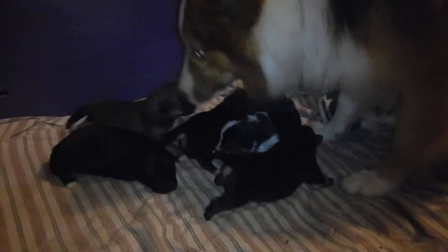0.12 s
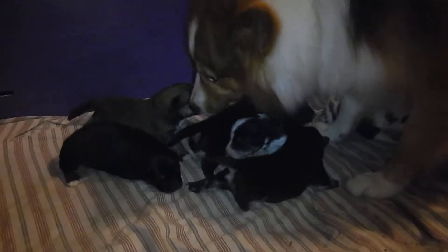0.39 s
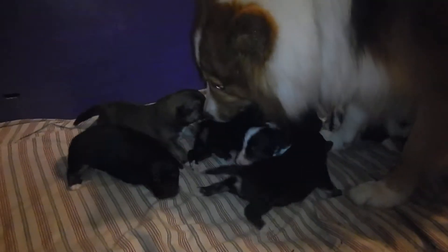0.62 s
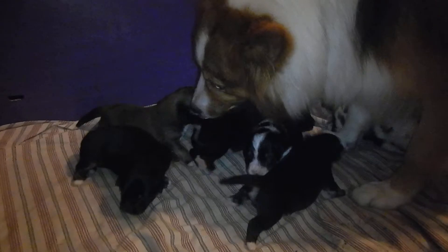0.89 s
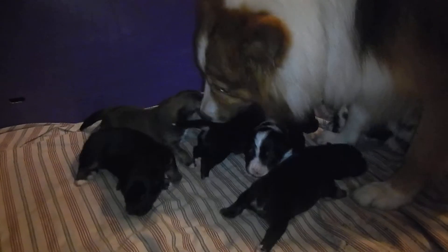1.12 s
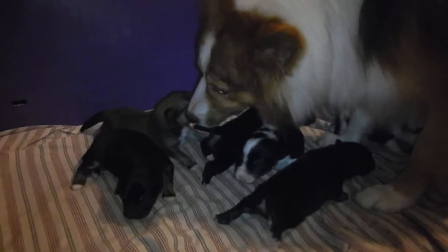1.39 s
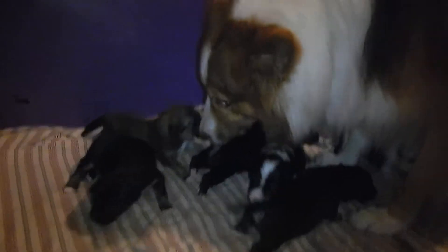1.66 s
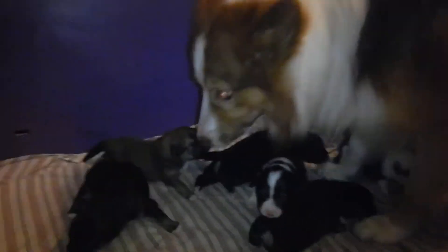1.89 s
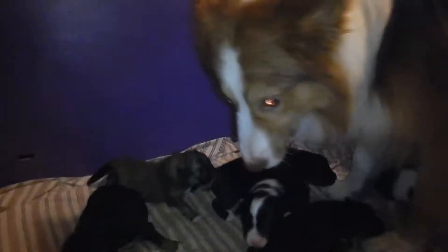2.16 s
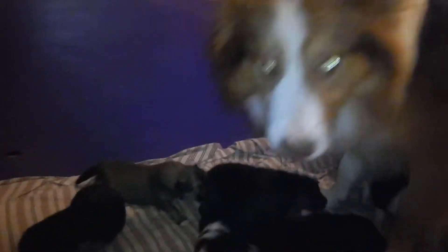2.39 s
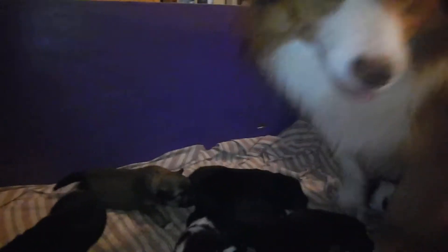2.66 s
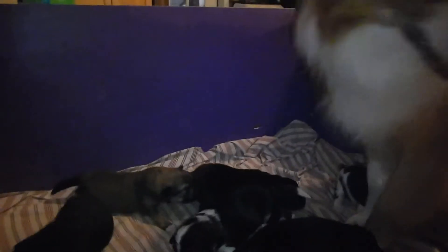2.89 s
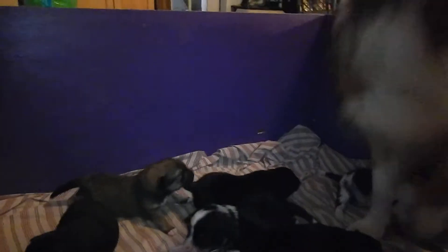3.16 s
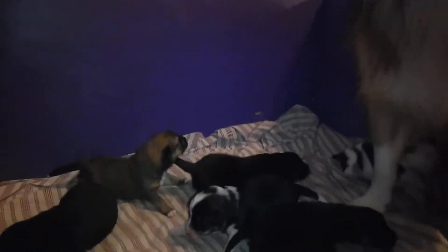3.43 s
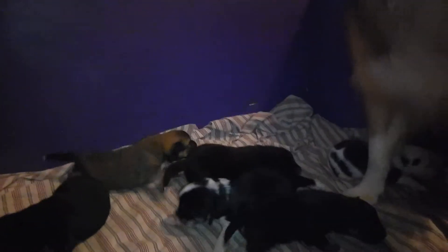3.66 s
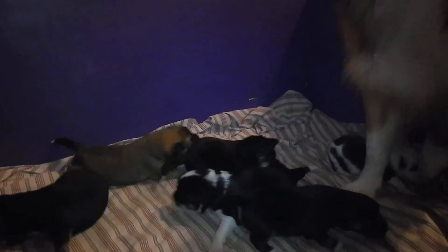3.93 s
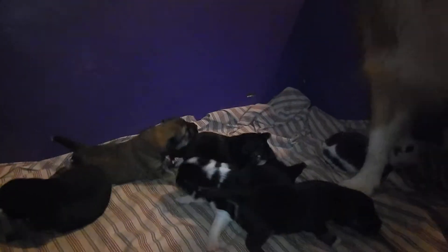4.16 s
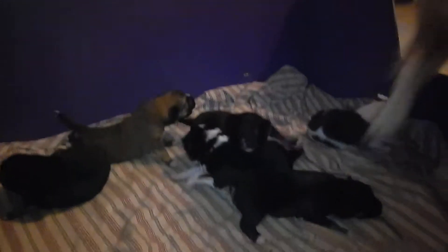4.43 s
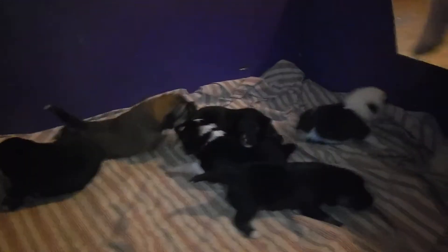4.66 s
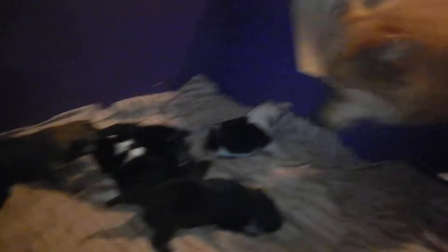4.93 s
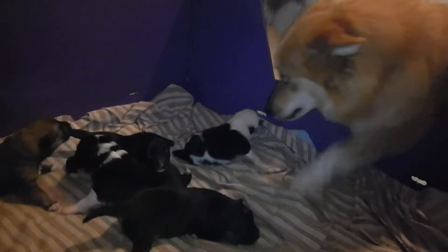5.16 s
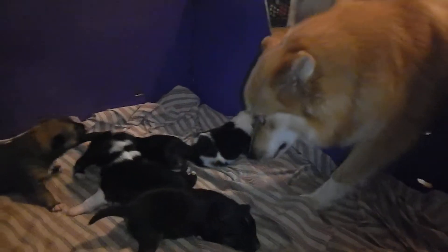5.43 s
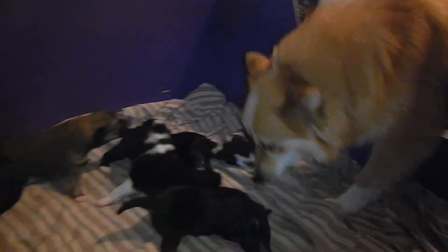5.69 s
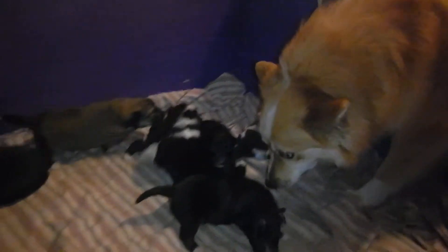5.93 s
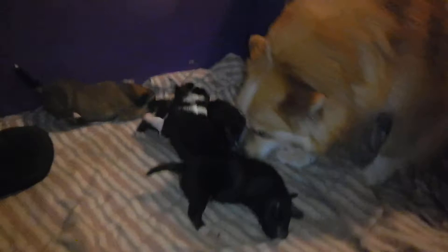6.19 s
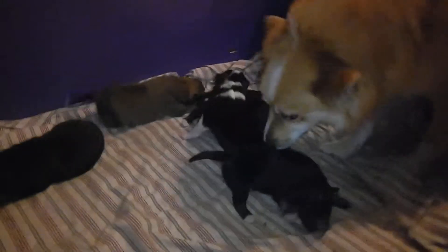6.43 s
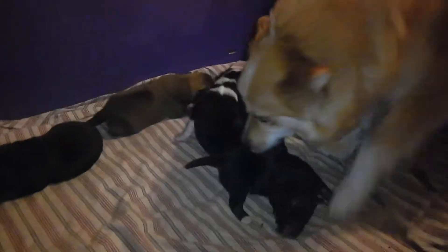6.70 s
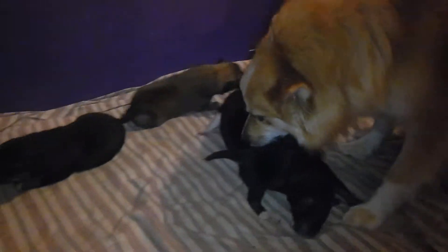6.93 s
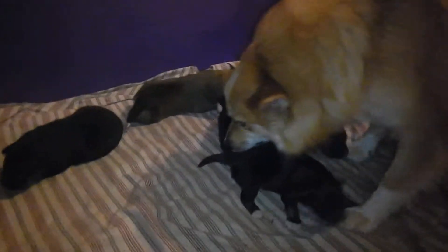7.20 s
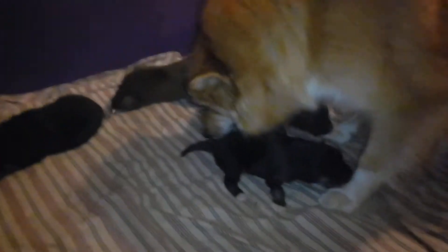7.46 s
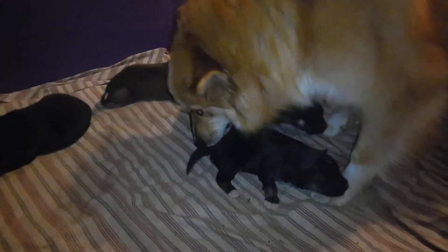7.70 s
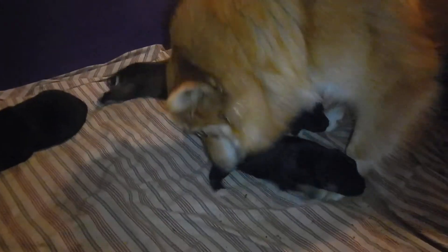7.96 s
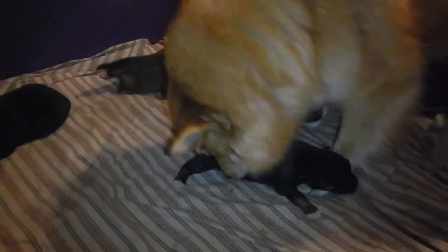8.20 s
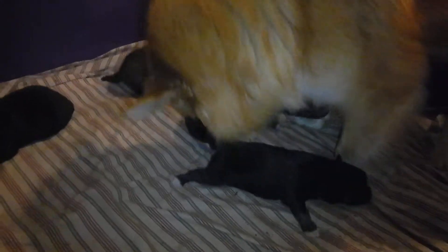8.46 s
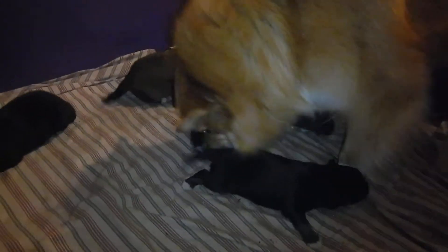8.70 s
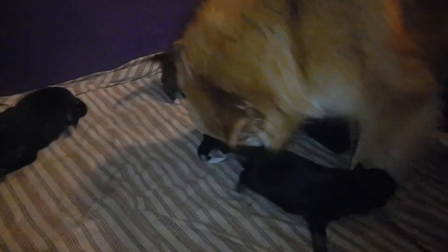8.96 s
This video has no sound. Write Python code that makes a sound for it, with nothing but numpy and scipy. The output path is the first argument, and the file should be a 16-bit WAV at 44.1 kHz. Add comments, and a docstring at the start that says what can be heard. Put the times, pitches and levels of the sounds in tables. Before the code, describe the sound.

Indoors, a low steady hum and soft air lie beneath fine blanket rustling and tiny claw ticks. Clicks, muffled bumps and faint puffs from a big dog's nose cluster early, then thin gliding puppy squeaks rise, loudest midway alongside several deep paw thumps. Weaker whimpers and occasional taps trail on to the end. Everything is near the microphone, with a short echo from the pen walls.

```python
"""A mains hum, the air of a room and faint rustling come first; then clicks, thumps, newborn puppies' cries, sniffs.
The pups squeak and whimper on a blanket in a walled pen, close to a hand-held camera: gliding near sines
with weak overtones, and one creak of throat pulses. Big dogs puff shaped noise over the litter; cloth rustles
as lumpy noise; claws and tongues click as short bursts; paws thump the pen floor as damped oscillations."""
import sys
import numpy as np
from scipy import signal
from scipy.fft import rfft, irfft
from scipy.io import wavfile
from scipy.ndimage import uniform_filter1d

SR = 44100
rng = np.random.default_rng(int(sys.argv[2]) if len(sys.argv) > 2 else 0)


def generate_wav(signal):
    """Clip the signal to [-1, 1] and save it as 16-bit WAV at the path in sys.argv[1]."""
    frames = np.transpose(np.atleast_2d(signal))
    scaled = np.clip(frames, -1, 1) * 32767
    pcm = np.round(scaled).astype(np.int16)
    wavfile.write(sys.argv[1], SR, pcm)


def how_loud(loudness_db):
    """Turn decibels into a plain amplitude multiplier (0 dB gives 1, 20 dB gives 10)."""
    steps = np.asarray(loudness_db, float) / 20
    return 10 ** steps


N = 400869
T = np.arange(N) / SR
LEFT_RIGHT = np.array([[1], [-1]])


def interp_log(hz, points):
    """Logarithmic frequency scale: interpolates the second column of points along log f."""
    point_hz, values = np.transpose(points)
    return np.interp(np.log(hz), np.log(point_hz), values)


def colour(x, points):
    """Spectral weighting: shapes x by (f/Hz, level/dB) points; unit rms for unit white noise."""
    hz = np.fft.rfftfreq(x.shape[-1], 1 / SR) + 1
    gain = how_loud(interp_log(hz, points))
    return irfft(rfft(x) * gain / np.sqrt(np.mean(gain ** 2)), x.shape[-1])


def walk(rate):
    """Band-limited fluctuation: random levels held 1 / rate s and smoothed twice; spread near 1."""
    hold = int(SR / rate)
    steps = np.repeat(rng.standard_normal(N // hold + 1), hold)
    return 1.34 * uniform_filter1d(uniform_filter1d(steps, hold), hold)[:N]


def ring(hz, t60, length):
    """Damped free oscillation from rest; t60 in s, length in samples."""
    t = np.arange(length) / SR
    return np.sin(2 * np.pi * hz * t) * np.exp(-np.log(1000) * t / t60)


def add(track, s, sound):
    """Superposition: lays a sound into a track at s seconds."""
    i = int(s * SR)
    track[..., i:i + sound.shape[-1]] += sound[..., :N - i]


# likeness of the two ports in a spread sound: f/Hz, left-right correlation [1]
LIKENESS = [(60, 0.92), (300, 0.7), (1400, 0.71), (2800, 0.48), (4000, 0.43), (7000, 0.036)]


def wide(points, make):
    """Spatial coherence: both ports hear the bass alike and the treble apart."""
    hz = np.fft.rfftfreq(N, 1 / SR) + 1
    alike = np.clip(interp_log(hz, LIKENESS), 0, 1)
    shared, opposed = (rfft(colour(make(), points)) for _ in range(2))
    mixed = np.sqrt(1 + alike) * shared + np.sqrt(1 - alike) * opposed * LEFT_RIGHT
    return irfft(mixed / np.sqrt(2), N)


AIR_DB = -47.5  # mean level; it wanders
HUM_HZ, HUM_DB = 120, -37.5  # mean rms level; it wavers
# spectrum of the room's air: f/Hz, level/dB per Hz
AIR = [(20, -10), (50, 2), (90, 10), (170, 2), (230, 0.5), (310, -10.5), (410, 3), (650, -14.5),
       (1300, -7.5), (2500, -14), (5500, -23), (7500, -23.5), (9500, -28), (16000, -36)]


def room():
    """Broadband noise and a pure tone: slowly wandering air and a slightly wavering hum at twice the mains."""
    air = wide(AIR, lambda: rng.standard_normal(N))
    hum_db = HUM_DB + 1.07 * walk(23) + 0.61 * LEFT_RIGHT
    hum = np.sqrt(2) * how_loud(hum_db) * np.sin(2 * np.pi * HUM_HZ * T)
    return how_loud(AIR_DB + 3.2 * walk(2.686)) * air + hum


def fibres(per_s, scatter_db, smear_s):
    """Stick-slip friction: noise made lumpy by many small catches of uneven size."""
    catches = (rng.random(N) < per_s / SR) * how_loud(scatter_db * rng.exponential(size=N))
    lumps = signal.lfilter([1], [1, -np.exp(-1 / (smear_s * SR))], catches) + 0.65
    x = lumps * rng.standard_normal(N)
    return x / uniform_filter1d(x ** 2, size=8000) ** .5


RISE_SHARE, FADE_SHARE = 0.15, 0.41  # time for a change of 20 dB, as a share of the edge time below
FIRM_DB, SOFTER_PER_DB = -46, 0.9  # firm strokes start and stop abruptly, lighter ones swell and ebb
SQUIRM_PRESS_DB = 8.5  # pressing over rubbing
# fur, paws and noses moving on the blanket: start t/s, length t/s, rub level/dB, press level/dB
RUSTLES = [(0.348, 0.018, -39.5, -45), (0.571, 0.063, -46, -51), (0.834, 0.079, -47, -49.5),
           (1.008, 0.062, -48, -46), (1.78, 0.036, -41.5, -47), (1.866, 0.13, -51, -47.5),
           (2.031, 0.038, -34.5, -35), (2.18, 0.07, -44, -56), (2.458, 0.03, -38, -37),
           (2.573, 0.064, -55, -44.5), (2.723, 0.049, -36.5, -38.5), (2.817, 0.045, -39.5, -40),
           (2.904, 0.14, -46.5, -38.5), (3.01, 0.034, -43, -50), (3.155, 0.025, -42, -45),
           (3.367, 0.042, -48.5, -32), (3.421, 0.061, -40.5, -36.5), (3.803, 0.09, -45, -42),
           (4.142, 0.055, -49, -45), (4.605, 0.11, -51.5, -48.5), (4.708, 0.03, -40, -50.5),
           (4.977, 0.075, -44.5, -44), (5.25, 0.045, -47, -35), (5.446, 0.02, -43, -45),
           (5.624, 0.12, -46.5, -38.5), (5.757, 0.023, -39.5, -33.5), (5.97, 0.058, -50.5, -44.5),
           (6.419, 0.017, -63, -39.5), (6.59, 0.05, -60, -38), (6.825, 0.099, -59, -44),
           (7.5, 0.037, -41, -48), (8.224, 0.012, -66, -42), (8.45, 0.1, -47, -50), (8.6, 0.09, -47.5, -48),
           (8.895, 0.029, -53.5, -44)]
# the litter squirming all along: t/s, rub level/dB
SQUIRM = [(0, -62), (1.2, -58), (2.3, -57.5), (2.5, -69.5), (3.0, -50.5), (3.6, -53.5), (4.05, -92),
          (4.5, -52.5), (5.33, -52), (5.55, -59.5), (6.2, -60), (7.0, -56.5), (7.4, -57.5), (8.0, -62),
          (8.4, -52.5), (9.09, -57)]


def movement():
    """Power addition of envelopes: each rustle rises, holds and fades over the continuous squirming."""
    t = T[::44]
    s, length, rub_db, press_db = np.transpose(RUSTLES)[:, :, None]
    edge_s = length * (2.0 + SOFTER_PER_DB * np.clip(FIRM_DB - rub_db, 0, 12))
    outside_s = np.maximum((s - t) / RISE_SHARE, (t - s - length) / FADE_SHARE)
    shape_db = -20 * np.maximum(0, outside_s / edge_s)
    squirm_db = np.interp(t, *np.transpose(SQUIRM))

    def total(db, under_db):
        power = np.sum(how_loud(db + shape_db) ** 2, axis=0) + how_loud(under_db) ** 2
        return np.interp(T, t, np.sqrt(power))

    return total(rub_db, squirm_db), total(press_db, squirm_db + SQUIRM_PRESS_DB)


# spectrum of fur brushing cloth, also of the scuff after a click: f/Hz, level/dB per Hz
RUB = [(700, -22), (1500, 0.5), (2300, 1), (3500, -4.5), (5500, -8), (7200, -10.5), (9000, -27),
       (15000, -31)]
# spectrum of the blanket crumpling: f/Hz, level/dB per Hz
PRESS = [(35, 3.5), (110, 13.5), (250, -8), (420, 5.5), (800, 0), (1500, -3), (2400, -1.5), (3000, -12.5),
         (5000, -32.5)]


def bedding():
    """Friction noise: fur brushing cloth swishes in fine grains; weight on the blanket crumples lower."""
    rubbing, pressing = movement()
    rub = wide(RUB, lambda: fibres(900, 2.9, .004))
    press = wide(PRESS, lambda: fibres(120, 4.4, 0.022))
    return rub * rubbing + press * pressing


TICKS_PER_S, TICK_DB = 8, -44  # level of the strongest at the centre


def ticks():
    """Impulse excitation: tiny claws snag threads at chance moments, each a brief ring at its own place."""
    out = np.zeros((2, N))
    for when, pitch, size, pan in rng.random((TICKS_PER_S * N // SR, 4)):
        snag = ring(1500 * 4 ** pitch, 0.011, length=400)
        level_db = TICK_DB - 15.0 * size + 6.0 * (pan - .5) * LEFT_RIGHT
        add(out, when * T[-1], how_loud(level_db) * snag)
    return out


# claws and tongues: t/s, contact level/dB, ring f/Hz, treble level/dB relative to the contact
CLICKS = [(0.366, -15, 1630, -16.5), (0.391, -39, 1000, -18), (0.416, -36, 2200, -18), (1.04, -42, 1400, 0),
          (3.353, -30, 1400, -18), (4.868, -34.5, 2096, -10), (6.645, -28.5, 898, -19),
          (2.179, -32, 820, -24), (2.204, -27, 890, -28), (2.248, -28.5, 840, -8), (2.475, -19.5, 2270, -5),
          (2.604, -24, 2040, -10), (2.725, -33.5, 1290, 1), (2.774, -38, 2300, -17),
          (2.921, -31, 1600, -21), (3.007, -28.5, 755, -6), (3.375, -23, 1260, -20),
          (3.383, -20.5, 1600, -13), (3.392, -19, 1430, -43), (3.668, -31, 2140, -5),
          (4.972, -26, 2240, -3), (5.517, -33, 1228, -10), (5.7644, -21, 2885, -2),
          (5.7667, -20.5, 1792, -11), (7.499, -31, 1414, -26), (8.096, -36, 1184, -40),
          (8.218, -28, 687, -14.5), (8.637, -33, 1460, -8)]


def clicks(rise_s=0.000624):
    """Impulsive contact: it builds and lets go in a few cycles, with a bright edge and a scuff after."""
    out = np.zeros((2, N))
    t = np.arange(1500) / SR
    contact = t / rise_s * np.exp(1 - t / rise_s)
    scuff_shape = np.minimum(contact.cumsum() / 60, 1) * np.exp(-t / 0.0053)
    for (s, db, hz, treble_db), (pan, *turns) in zip(CLICKS, rng.standard_normal((len(CLICKS), 5))):
        def tone(f_hz, k):
            return np.sin(2 * np.pi * (f_hz * t + turns[k]))

        def snap(f_hz):
            return np.cos(2 * np.pi * (f_hz * (t - rise_s) + turns[0]))

        body = snap(hz) + .5 * snap(0.72 * hz) + 0.49 * snap(1.476 * hz)
        edge = how_loud(treble_db) * (tone(3510, 2) + 0.59 * tone(4800, 3) * LEFT_RIGHT)
        scuff = 0.15 * colour(rng.standard_normal((2, len(t))), RUB) * scuff_shape
        side = how_loud(2.0 * pan * LEFT_RIGHT / 2)
        add(out, s, how_loud(db) * (contact * (body + edge) + scuff) * side)
    return out


# paws on the pen floor: t/s, boom level/dB, boom f/Hz, knock level/dB
THUMPS = [(0.773, -23, 223, -41), (0.936, -27, 210, -55), (2.724, -20, 432, -42), (2.828, -20, 103, -37),
          (3.005, -28, 120, -26.5), (4.725, -8, 225, -22.5), (4.728, -8.5, 145, -35),
          (4.735, -12, 84, -33.5), (4.762, -14.5, 140, -40), (4.976, -14, 136, -15),
          (4.98, -8.5, 85.8, -22.5), (5.009, -9.5, 89, -50), (5.282, -13, 149, -30),
          (5.393, -10.5, 98.7, -33), (5.682, -30, 134.5, -30), (5.76, -23.5, 135, -25),
          (6.638, -20.5, 127.4, -28.5), (7.242, -27, 380, -27.5), (7.5, -22, 110.7, -26.5),
          (8.099, -34, 117.2, -27.5), (8.22, -40, 400, -27), (8.234, -23, 134, -29.5)]
# modes of the pen's panels, varied at each thump: nominal f/Hz, nominal level/dB, t60 t/s
PANELS = [(235.5, -3, 0.069), (428, 0.5, 0.069), (533, 1.5, 0.039), (661, 4, 0.022)]


def thumps(cycles=14.0):
    """Modal excitation by a soft paw: the floor booms where it gives, and the pen's panels knock."""
    out = np.zeros(N)
    push = np.hanning(60)
    for (s, db, hz, knock_db), shares in zip(THUMPS, rng.standard_normal((len(THUMPS), len(PANELS)))):
        boom_t60 = cycles / hz
        boom = ring(hz, boom_t60, 12000) + 0.27 * ring(1.755 * hz, boom_t60 / 1.12, 12000)
        knock = np.zeros(12000)
        # each mode's sign, strength and slight detuning vary from thump to thump
        for g, (mode_hz, mode_db, t60) in zip(shares, PANELS):
            strength = np.sign(g) * how_loud(mode_db - 3.5 + 2.9 * np.abs(g))
            knock += strength * ring(mode_hz * (1 + 0.037 * g), t60, 12000)
        # the floor gives for about half a cycle of its boom
        give = np.hanning(int(SR / hz / 2))
        add(out, s, how_loud(db) * np.convolve(boom, give / give.sum()))
        add(out, s, how_loud(knock_db) * np.convolve(knock, push / push.sum()))
    return out


YIP_SETTLES, YIP_SWELL_DB = 0.2, 1.5  # time constant of the glide as a share of the length; middle over ends
# whimpers, one table a breath: t/s, pitch f/Hz, level/dB
WHIMPERS = [
    [(1.022, 766, -43), (1.034, 676, -33.5), (1.039, 453, -33), (1.06, 425.4, -31.5), (1.068, 423, -45)],
    [(2.106, 1547, -30.5), (2.122, 1410, -32), (2.127, 1100, -35.5), (2.134, 974, -34.5)],
    [(4.412, 2726, -42), (4.419, 2673, -36), (4.441, 2638, -35), (4.456, 2324, -42)],
    [(8.095, 1410, -35.5), (8.103, 1028, -40), (8.117, 1287, -35.5), (8.126, 1120, -53)],
    [(3.543, 1315, -28), (3.559, 1387, -26.5), (3.609, 2064, -20.5), (3.635, 2138, -20), (3.667, 2074, -27),
     (3.671, 1540, -31.5), (3.681, 1380, -48)],
    [(3.897, 2340, -26), (3.905, 2350, -20), (3.933, 2147, -25.5), (3.953, 2247, -23.5), (3.963, 2220, -41)],
    [(4.642, 2350, -24), (4.648, 2370, -12.5), (4.672, 2457, -16), (4.692, 2450, -14.5),
     (4.708, 2314, -11.5), (4.73, 2226, -27), (4.746, 2025, -31), (4.758, 2106, -24), (4.79, 2005, -40)],
    [(4.973, 2193, -18.5), (5.011, 2470, -27), (5.039, 2476, -22.5), (5.061, 2170, -28.5),
     (5.081, 1984, -18.5), (5.097, 1896, -42), (5.099, 1540, -26.5), (5.105, 1325, -38)],
    [(5.272, 1603, -32), (5.284, 1444, -34), (5.301, 1346, -27), (5.335, 1576, -37), (5.36, 1437, -29),
     (5.37, 1387, -46)],
    [(6.274, 1647, -40), (6.296, 1510, -46), (6.318, 1700, -29), (6.332, 1915, -34), (6.376, 1908, -31),
     (6.388, 1885, -25), (6.398, 1793, -34), (6.41, 1267, -51)],
    [(6.581, 1846, -34), (6.593, 1720, -42), (6.609, 1677, -23.5), (6.629, 1773, -43), (6.647, 1670, -27),
     (6.671, 1447, -25.5), (6.709, 1380, -25.5), (6.739, 1150, -36)],
    [(7.503, 1460, -36), (7.541, 1304, -27), (7.583, 1360, -32), (7.601, 1270, -41)],
    [(7.789, 1330, -63), (7.795, 1206, -33), (7.813, 968, -42), (7.831, 893, -41), (7.873, 985, -36.5),
     (7.905, 889, -42.5), (7.914, 655, -48), (7.926, 640, -42)],
]
# short yips and grunts: start t/s, length t/s, first f/Hz, last f/Hz, mid level/dB
YIPS = [(4.161, 0.012, 800, 691, -28), (4.346, .035, 791, 503.3, -35), (4.593, 0.035, 423, 423.3, -29),
        (5.622, 0.0402, 1150, 902, -41), (5.98, 0.019, 1018, 932, -41.5), (6.744, 0.015, 892, 857, -32.5),
        (7.636, 0.02125, 906, 957, -40.5)]


def breaths():
    """Pitch glide: every cry as (s, Hz, dB) points; a yip relaxes fast to its last pitch and swells midway."""
    share = np.linspace(0, 1, 9)
    yips = []
    for s, length, first_hz, last_hz, db in YIPS:
        pitch = last_hz + (first_hz - last_hz) * np.exp(-share / YIP_SETTLES)
        level_db = db - YIP_SWELL_DB * (2 * share - 1) ** 2
        yips.append(np.transpose([s + length * share, pitch, level_db]))
    return sorted([np.array(cry) for cry in WHIMPERS] + yips, key=lambda cry: cry[0, 0])


ATTACK_S, RELEASE_S = 0.0039, 0.004  # of every breath
OVERTONE_FROM_DB, OVERTONE_GROWTH = -28, .6  # level where overtones match the effort; dB per dB of effort
ORDER_DB = -3  # extra level per order above the third partial
# the litter drifts across as the camera turns: t/s, left minus right level/dB
LITTER_SIDE = [(1.0, 0), (3.6, -3), (4.7, 0.5), (5.8, 4.5), (6.7, 1), (7.8, 1.5), (8.2, -3)]
# a wider mouth lets more of the lower overtones out: t/s, level/dB
MOUTH = [(1.036, 7.5), (1.048, -12), (1.07, -13), (2.12, -7), (2.13, 5), (3.56, 4), (3.6, -1.5), (4.6, -7),
         (5.085, 9), (5.3, 4), (5.98, -8), (6.35, 0.5), (6.72, 2), (6.741, 12), (6.748, -16), (7.5, -5.5),
         (7.9, 0.5), (7.915, 11), (8.1, 0.5)]
# second partial before the mouth acts: pitch f/Hz, level/dB relative to the effort
SECOND = [(420, -13), (700, -9), (960, -6), (1150, -6), (1400, -19), (1700, -27), (1900, -36), (2250, -33),
          (2450, -41), (2700, -33)]
# third and higher partials before mouth and order act: partial f/Hz, level/dB relative to the effort
OVERTONES = [(1250, -14), (1700, -20), (2300, -25), (4300, -42), (5700, -33), (6050, -47), (7300, -35),
             (8200, -41), (9800, -40), (10800, -46), (12300, -38), (12800, -28), (13300, -52)]


def cries(jitter=.002, shimmer_db=.7, breath_db=-25, patchy_db=4.5):
    """Vocal-fold oscillation: tiny folds give a near sine with weak overtones, blurred by leaking air."""
    gate, pitch, level_db, held_db = np.zeros(N), np.full(N, 1000.), np.zeros(N), np.zeros(N)
    for cry in breaths():
        start, end = cry[0, 0], cry[-1, 0]
        t = np.arange(start - ATTACK_S, end + RELEASE_S, 1 / SR)
        first = int(t[0] * SR)
        now = slice(first, first + len(t))
        # muscles cannot turn sharply, so the pitch rounds its corners
        pitch[now] = uniform_filter1d(np.interp(t, cry[:, 0], cry[:, 1]), size=260, mode="nearest")
        level_db[now] = np.interp(t, cry[:, 0], cry[:, 2])
        held_db[now] = uniform_filter1d(level_db[now], size=1800, mode="nearest")
        ramp = np.minimum(1 + (t - start) / ATTACK_S, 1 + (end - t) / RELEASE_S)
        add(gate, t[0], np.clip(ramp, 0, 1) ** 2)
    side_db = np.interp(T, *np.transpose(LITTER_SIDE)) * LEFT_RIGHT / 2
    placed = np.minimum(gate, 1) * how_loud(side_db)
    pitch = pitch * (1 + jitter * walk(150))
    phase = 2 * np.pi * np.cumsum(pitch) / SR
    # slack folds at low pitch leak more air, so grunts are hoarser than squeaks
    hoarse = how_loud(breath_db) * 2500 / pitch
    # overtones follow the slow effort, and grow less than the first partial when a pup cries harder
    effort_db = OVERTONE_FROM_DB + OVERTONE_GROWTH * (held_db - OVERTONE_FROM_DB)
    mouth_db = np.interp(T, *np.transpose(MOUTH))
    second_db = np.interp(pitch, *np.transpose(SECOND)) + mouth_db + 2.0 * walk(60)
    upper = how_loud(second_db) * np.sin(2 * phase + .25 * walk(500))
    for k in range(3, 7):
        opened_db = mouth_db * np.clip(1 - k * pitch / 4000, 0, 1) + ORDER_DB * (k - 3)
        partial_db = np.interp(k * pitch, *np.transpose(OVERTONES)) + opened_db + patchy_db * walk(70)
        upper += how_loud(partial_db) * np.sin(k * phase + .8 * walk(560))
    fundamental = how_loud(level_db) * np.sin(phase) * (1 + hoarse * walk(900))
    shimmer = how_loud(shimmer_db * walk(90))
    return placed * np.sqrt(2) * shimmer * (fundamental + how_loud(effort_db) * upper)


# spectrum of a nose's hiss: f/Hz, level/dB per Hz
NOSTRIL = [(2500, -19), (5000, -4), (6300, -1), (7600, -9), (11000, -30)]
# a big dog's nose puffs air over the litter: start t/s, length t/s, level/dB
SNIFFS = [(1.78, 0.024, -51), (2.04, .04, -49), (2.754, 0.024, -48), (2.823, 0.059, -46),
          (3.027, 0.04, -42.5), (3.156, 0.035, -44.5), (3.432, 0.039, -42), (7.505, 0.037, -43.5)]


def sniffs(edge_s=0.0071):
    """Turbulent flow noise: smooth bright hiss that swells through each puff and stops short."""
    s, length, db = np.transpose(SNIFFS)[:, :, None]
    t = T[::44]
    swell = np.minimum((t - s) / length + 0.53, (s + length - t) / edge_s + 1)
    flow = np.clip(swell, 0, 1) * (t > s - edge_s)
    strength = np.interp(T, t, np.sum(how_loud(db) * flow, axis=0))
    return strength * wide(NOSTRIL, lambda: rng.standard_normal(N))


CREAK_S, CREAK_LENGTH_S, CREAK_PER_S = 2.543, .155, 90  # start, length, mean closures per second
CREAK_DB, CREAK_SWELL_DB = -38, 8  # pulse level midway before throat and fluctuation; middle over ends
# resonances of a pup's throat: f/Hz, width f/Hz, level/dB
CREAK_THROAT = [(510, 96, -7), (1150, 570, 0), (1880, 480, 20)]


def creak():
    """Source-filter model: slow separate closures of the vocal folds each ring the throat."""
    share = (T - CREAK_S) / CREAK_LENGTH_S
    cycles = np.cumsum((share > 0) * CREAK_PER_S * (1 + 0.12 * walk(70))) / SR
    swell_db = CREAK_DB - CREAK_SWELL_DB * np.minimum((2 * share - 1) ** 2, 1) + 2.0 * walk(90)
    swell = how_loud(swell_db) * (share > 0) * (share < 1)
    throat = sum(how_loud(db) * ring(hz, np.log(1000) / (np.pi * width), 800) for hz, width, db in CREAK_THROAT)
    closures = np.diff(np.floor(cycles), prepend=0) * swell
    # each closure takes a fraction of a millisecond, which dulls the top
    return uniform_filter1d(signal.fftconvolve(closures, throat)[:N], size=11)


PEN_T60_S, PEN_DB = 0.38, -12.5


def pen_walls():
    """Diffuse reverberation: decaying noise, alike at both ports in the bass where waves are long."""
    t = np.arange(SR // 2) / SR
    walls = rng.standard_normal((2, len(t))) * np.exp(-np.log(1000) * t / PEN_T60_S) * (t > .004)
    alike = walls.mean(axis=0)
    high_pass = signal.butter(2, 300, "high", fs=SR, output="sos")
    walls = alike + signal.sosfilt(high_pass, walls - alike)
    return walls * how_loud(PEN_DB) / np.sqrt(np.sum(walls ** 2, axis=1, keepdims=True))


def scene():
    """Superposition: near sounds with the short echo of the pen walls, over bedding, sniffs and room."""
    near = ticks() + clicks() + thumps() + cries() + creak()
    echo = signal.fftconvolve(near, pen_walls(), axes=1)[:, :N]
    return near + echo + room() + bedding() + sniffs()


def low_pass(x):
    """Removes everything above the highest recorded frequency."""
    return signal.sosfilt(signal.butter(12, 16640, fs=SR, output="sos"), x)


BASS_HZ, TOP_HZ = 41.7, 15800  # bass is 6 dB down here; nothing passes from the top limit up
# cavities of the camera body: f/Hz, width f/Hz, level/dB
BODY = [(2506, 89, -11), (3200, 77, -27), (3850, 756, 11), (4288, 580, -9.5), (4976, 120, -12.5),
        (5443, 1840, 12)]


def record(dry):
    """Cavity resonance: the camera body puts dips and bumps in the treble; deep bass and the top are cut."""
    hz = np.fft.rfftfreq(N, 1 / SR)
    body_db = sum(db / (1 + (2 * (hz - centre_hz) / width) ** 2) for centre_hz, width, db in BODY)
    passed = (hz < TOP_HZ) * hz ** 2 / (hz ** 2 + BASS_HZ ** 2)
    mix = irfft(rfft(dry) * how_loud(body_db) * passed, N)
    return low_pass(mix)


dry = scene()
out = record(dry)
generate_wav(out)
```